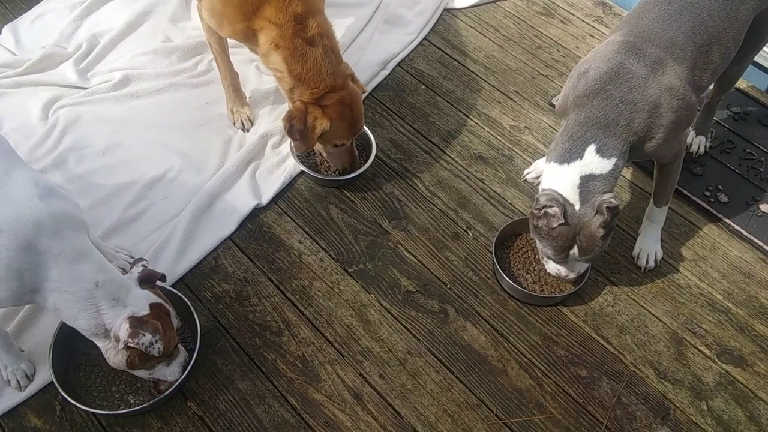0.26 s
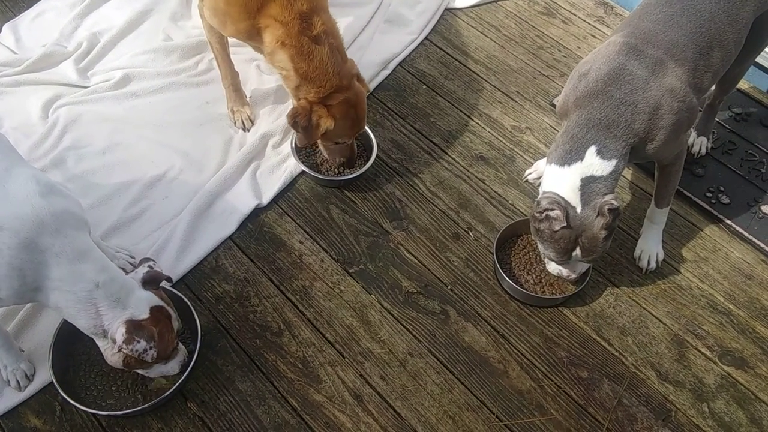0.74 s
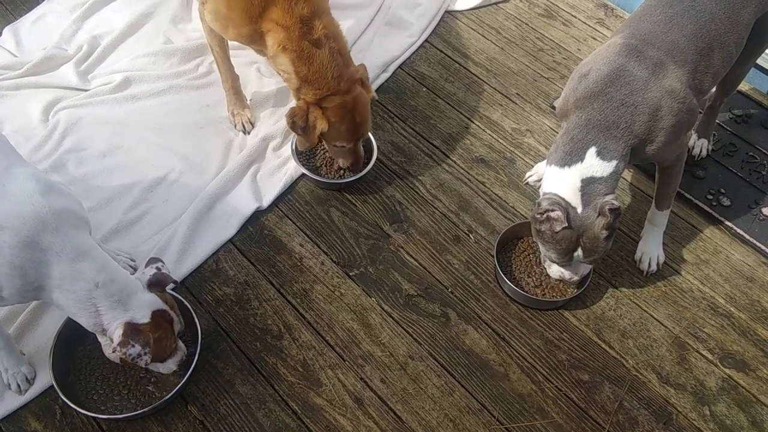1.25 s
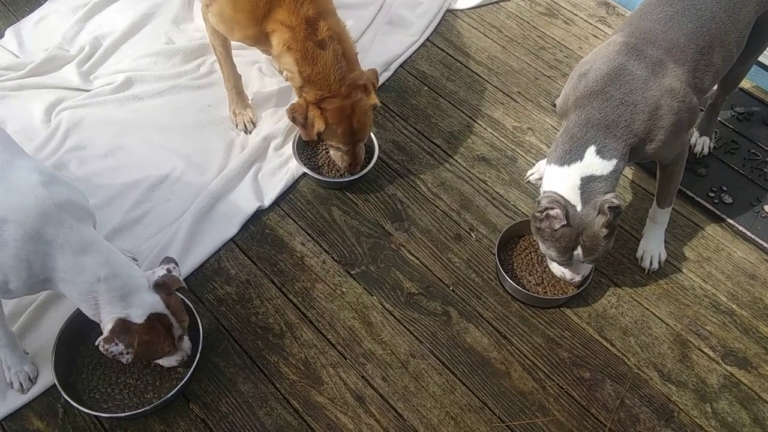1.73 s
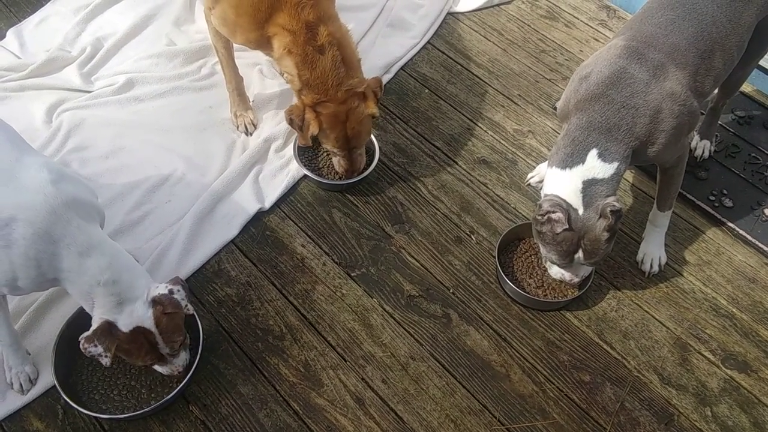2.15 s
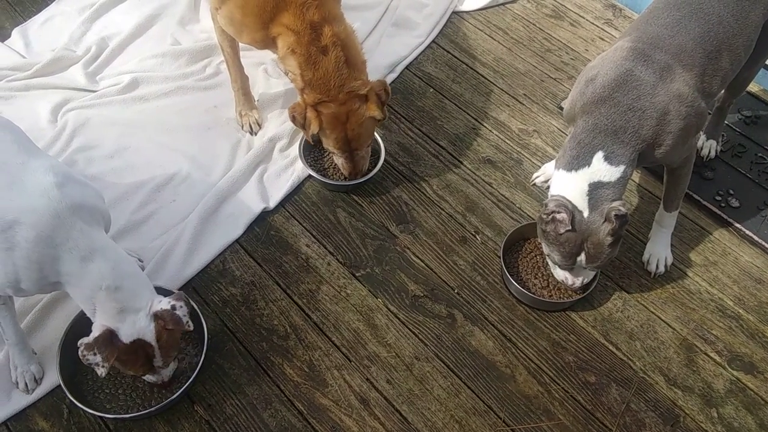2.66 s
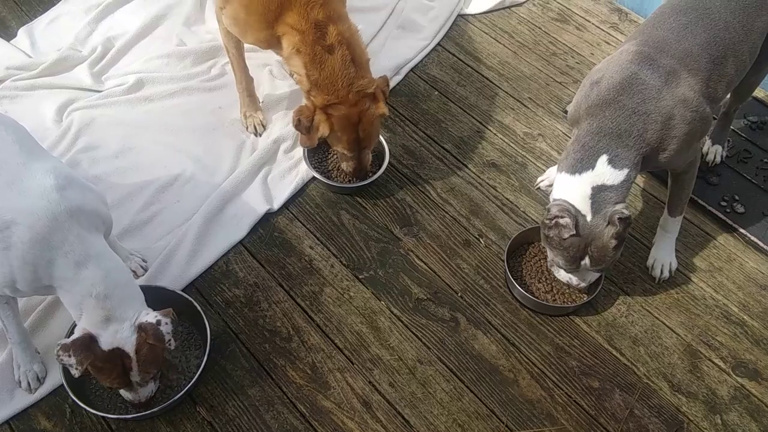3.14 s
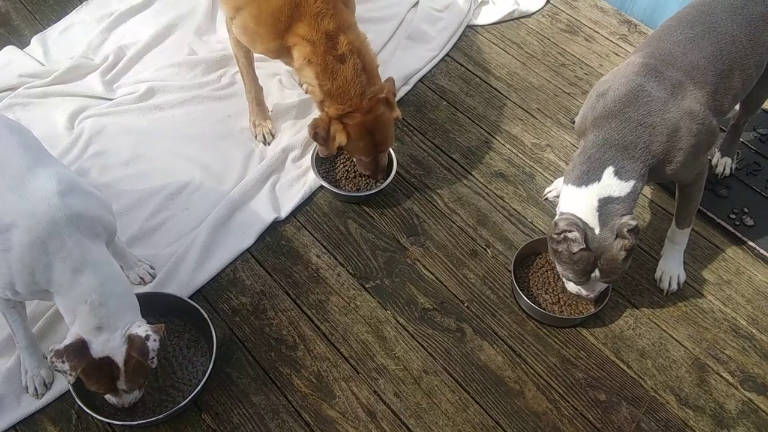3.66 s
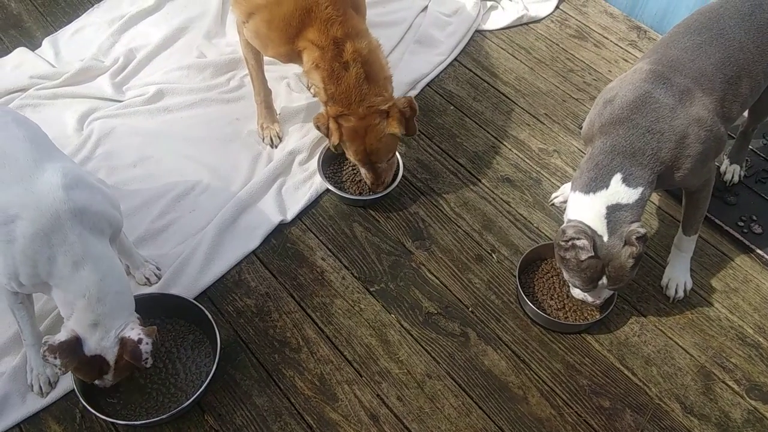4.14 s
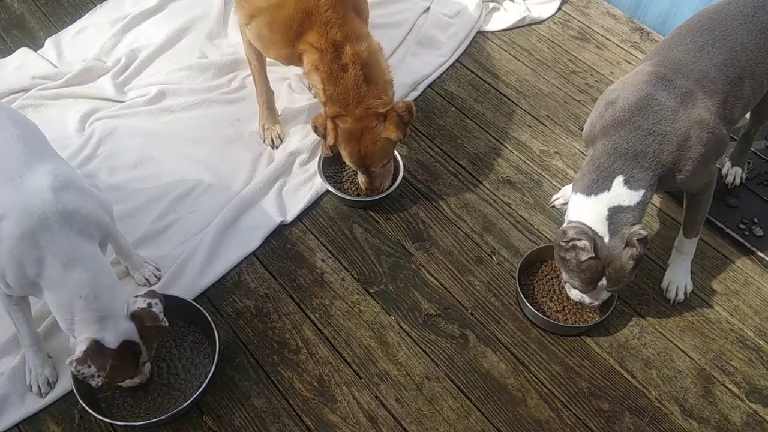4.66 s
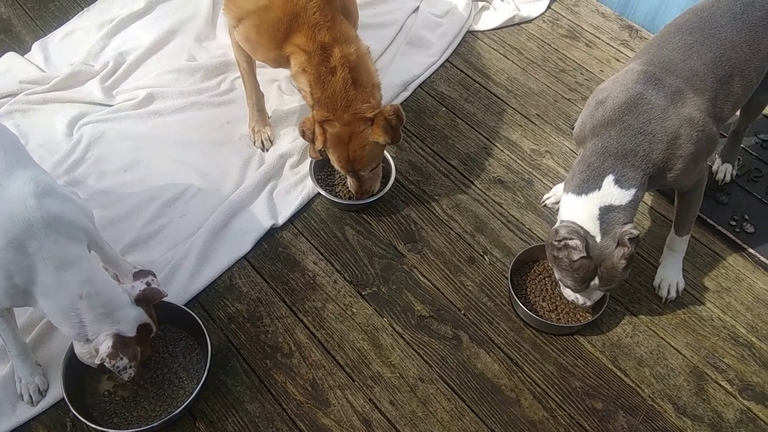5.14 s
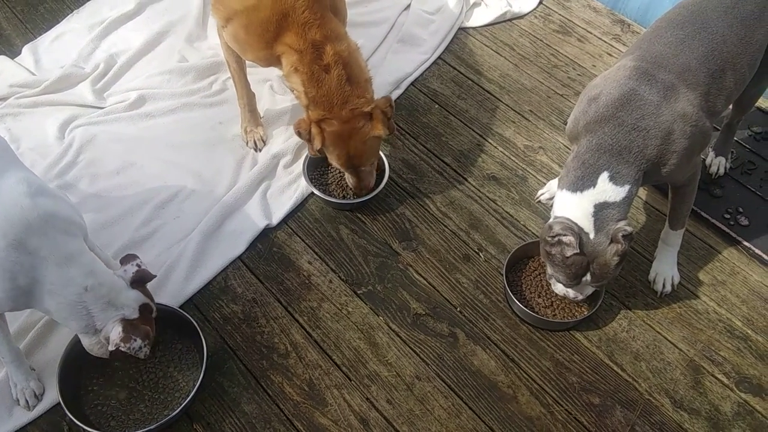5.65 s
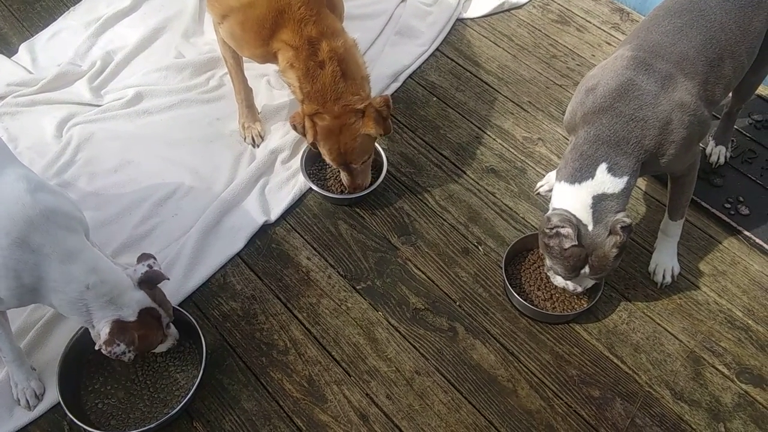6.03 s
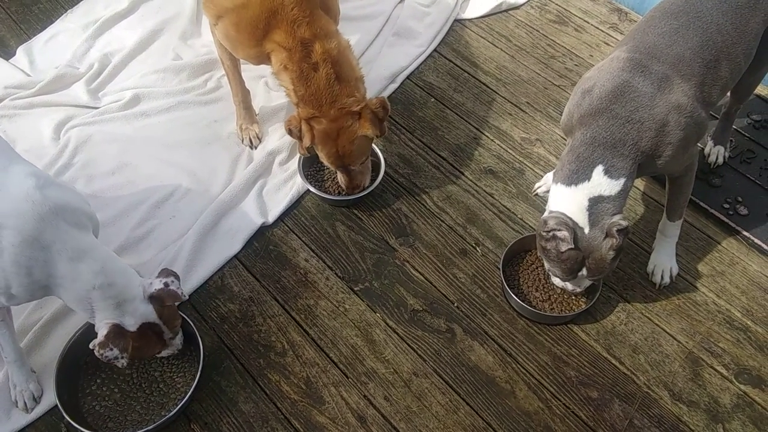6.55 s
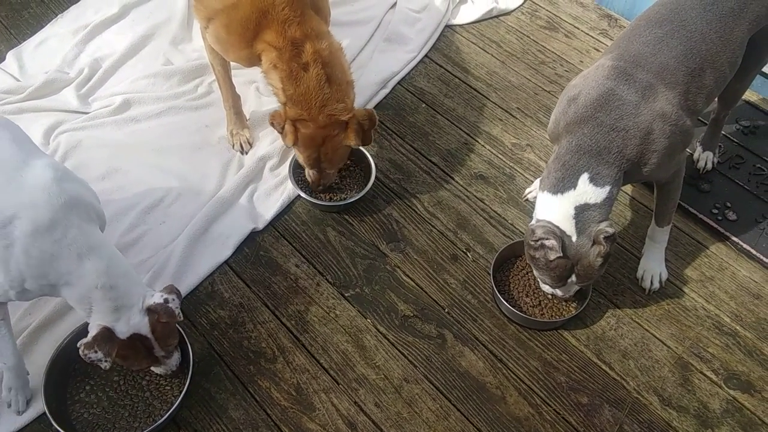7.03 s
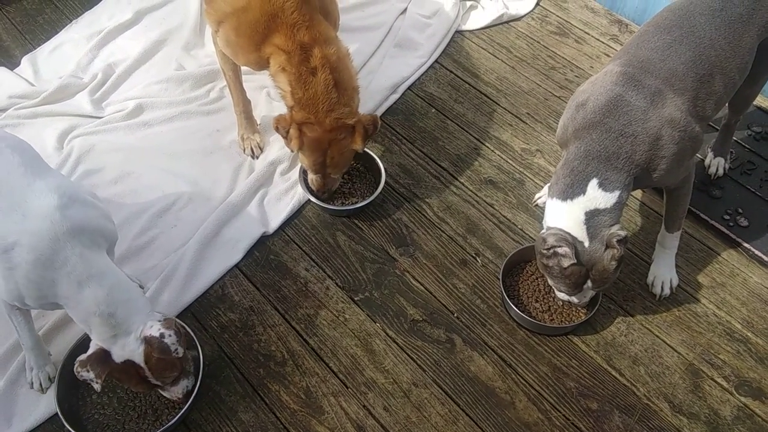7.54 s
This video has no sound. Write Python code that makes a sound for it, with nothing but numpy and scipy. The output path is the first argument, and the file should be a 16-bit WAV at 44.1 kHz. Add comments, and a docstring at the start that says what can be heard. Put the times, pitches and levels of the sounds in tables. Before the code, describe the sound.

Three dogs crunch dry kibble from metal bowls on an outdoor wooden deck, pellets popping, clicking and rattling in quick irregular bursts.

```python
"""An outdoor wooden deck in still air, where three dogs eat dry kibble from metal bowls.
Jaw strokes grind pellets in dense bursts of small fractures; single pellets pop in the hollow of a mouth,
click on teeth and bowls or snap brightly, and muzzles stir the food as a stream of small knocks.
The full bowls ring briefly, one is knocked on the boards, and the deck adds a short scatter."""
import sys
import numpy as np
from scipy import signal
from scipy.io import wavfile
from scipy.ndimage import uniform_filter1d

SR = 44100
rng = np.random.default_rng(int(sys.argv[2]) if len(sys.argv) > 2 else 0)


def master(y):
    """Save y as 16-bit WAV."""
    cut = np.clip(np.atleast_2d(y).T, -1, 1)
    pcm = np.round(cut * 32767)  # scale
    wavfile.write(sys.argv[1], SR, pcm.astype(np.int16))


N = 343539

# Colour of still outdoor air. Each row: frequency in Hz, relative level in dB per Hz.
AIR_COLOUR = [(30, -14), (110, -24.5), (1500, 9), (4000, -8), (6500, -46), (12200, -27.5)]
# Damped modes of the filled bowls. Each row: frequency in Hz, width in Hz, relative gain in dB.
BOWL_MODES = [(688, 52, 11), (812, 40, 1), (2326, 50, -2)]
# A hard shove knocks a bowl against the boards. One row: start in seconds, level of the thud in dB.
BOWL_KNOCK = (.6995, -48)
# What the knocked bowl rings with. Each row: frequency in Hz, peak in dB, 60 dB decay in seconds.
CLANK_MODES = [(1246, -22.5, 0.062), (1685, -7.5, 0.029), (2320, -8.5, 0.026), (3260, -16, 0.018)]
# Moments when all three muzzles leave the food alone. Each row: middle in seconds.
LULLS = [0.67, 0.99, 1.34, 1.68, 2.52, 2.7, 3.5, 3.88, 4.21, 4.62, 4.75, 6.08]
# Colour of the stirred pellets. Each row: frequency in Hz, relative level in dB per Hz.
STIR_COLOUR = [(200, -20), (400, -14), (800, -8), (1300, 7), (2100, 5), (3200, -5), (4600, -11),
               (7000, -34.5), (12000, -61)]
# The clearest brittle snaps at the front teeth. Each row: start in seconds, relative level in dB.
SNAPS = [(0.258, -58.5), (0.5146, -56.5), (0.7009, -43.5), (0.722, -48), (1.0919, -58), (1.1747, -55),
         (1.202, -50.5), (1.2318, -57.5), (1.5597, -56), (1.78, -44), (1.895, -56), (1.969, -59),
         (2.017, -49.5), (2.838, -48.5), (3.05, -57), (3.206, -58), (3.316, -57.5), (3.5898, -49.5),
         (3.606, -56), (4.0254, -51), (4.344, -48), (4.4846, -45), (4.5512, -55.5), (4.88, -56.5),
         (5.094, -56), (5.62, -53), (5.711, -55), (5.766, -51.5), (5.9533, -54), (6.104, -58), (6.151, -51),
         (6.488, -54.5), (6.6537, -49.5), (7.266, -60)]
# Colour of a brittle fracture. Each row: frequency in Hz, relative level in dB per Hz.
SNAP_COLOUR = [(3000, 24), (5500, 9.5), (7100, -8.5), (8600, 2.5), (11500, -5.5), (12700, -14.5),
               (15500, -33.5)]
# Hard pellets clicking on teeth and bowl walls.
# Each row: start in seconds, relative peak in dB, pitch in Hz.
TICKS = [(0.513, -35.5, 4120), (0.838, -32, 3100), (0.917, -37.5, 4520), (1.081, -28.5, 3250),
         (1.232, -29.5, 5280), (1.425, -22, 2770), (2.608, -37, 3120), (2.634, -35, 3500),
         (2.654, -31.5, 3560), (2.788, -33.5, 3750), (3.316, -29, 3160), (3.374, -33, 4000),
         (4.123, -39.5, 4940), (4.243, -35.5, 3580), (4.341, -18.5, 3070), (4.816, -30, 2920),
         (5.129, -19.5, 2970), (5.418, -25.5, 4120), (5.568, -25.5, 3250), (6.138, -29, 4080),
         (6.35, -29.5, 2800), (6.482, -33.5, 4390), (7.554, -31.5, 2890)]
# Jaws closing on a mouthful. Each row: start in seconds, relative peak in dB.
CHOMPS = [(0.001, -28.5), (1.054, -33.5), (2.025, -39), (2.74, -32.5), (3.878, -37.5), (4.485, -35),
          (5.091, -39.5), (6.144, -30.5), (6.435, -36), (6.748, -31.5)]
# The loudest pellets that crack or knock, each with the hollow that rings.
# Each row: start in seconds, relative level in dB, pitch of the hollow in Hz,
# relative level of the sharp edge in dB.
POPS = [(0.089, -24, 2230, -53), (0.104, -24, 1820, -38), (0.197, -21.5, 1400, -43),
        (0.267, -22, 2420, -50), (0.328, -17, 1610, -42), (0.534, -15.5, 1376, -54),
        (0.713, -15, 1560, -34), (0.721, -19, 1290, -34), (0.853, -15, 1905, -46), (0.943, -25, 2080, -42),
        (1.081, -27, 1070, -48), (1.171, -20.5, 1235, -36), (1.27, -27.5, 2630, -52),
        (1.398, -21.5, 1540, -62), (1.425, -21, 2180, -40), (1.469, -27.5, 2150, -41),
        (1.573, -21.5, 2280, -53), (1.782, -11.5, 1390, -28.5), (1.812, -24, 1540, -46),
        (1.871, -20.5, 1700, -48), (1.917, -19.5, 2040, -35), (2.016, -20, 1640, -38),
        (2.24, -26.5, 1390, -41), (2.312, -23, 1480, -45), (2.463, -19, 1320, -47),
        (2.581, -23, 1930, -45.5), (2.609, -35, 1280, -48), (2.656, -34, 1110, -50),
        (2.761, -18, 1980, -50), (2.799, -22, 720, -38.5), (2.837, -10.5, 1510, -40),
        (2.845, -14.5, 1520, -50), (2.86, -18.5, 1250, -52), (2.873, -18.5, 1280, -57),
        (2.884, -21, 1300, -42), (2.991, -27, 1310, -38.5), (3.057, -22, 1590, -40),
        (3.102, -26.5, 2000, -51), (3.141, -20, 1270, -61), (3.206, -29, 776, -40.5),
        (3.261, -23, 1195, -64), (3.447, -36.5, 644, -46), (3.597, -10, 1570, -35.5),
        (3.611, -17, 1430, -56), (3.732, -16, 1990, -35), (4.076, -19.5, 2100, -49),
        (4.141, -39, 2980, -33), (4.346, -10.5, 1835, -31), (4.353, -16, 1650, -38),
        (4.375, -22.5, 1200, -61), (4.404, -28, 1880, -55), (4.472, -20, 1670, -45),
        (4.699, -21.5, 1320, -47), (5.011, -27, 1940, -52), (5.094, -21, 1650, -36.5),
        (5.128, -20.5, 2170, -46), (5.346, -22, 1330, -56), (5.41, -21, 1580, -48),
        (5.467, -22.5, 1900, -57), (5.62, -23, 1790, -50), (5.643, -17, 1370, -56), (5.777, -20, 1940, -56),
        (5.868, -22, 2100, -27), (5.954, -17.5, 1375, -37.5), (5.965, -20.5, 1500, -54),
        (6.026, -26.5, 1190, -53), (6.154, -18.5, 1350, -38), (6.233, -26, 2000, -51),
        (6.254, -15.5, 1304, -49), (6.372, -27, 1320, -61), (6.391, -36, 750, -59),
        (6.442, -27.5, 2050, -49), (6.565, -24, 1090, -39), (6.622, -19.5, 1325, -64),
        (6.74, -24, 2000, -54), (6.754, -20, 1520, -38), (6.797, -23, 2080, -38), (6.878, -22, 2450, -38),
        (7.015, -22.5, 1400, -54), (7.12, -17, 1450, -64), (7.154, -21.5, 1340, -64),
        (7.42, -16.5, 1330, -57), (7.588, -24.5, 1350, -42), (7.634, -27.5, 1260, -55)]
# Where the sharp edge of a crack lies. One row: lower limit in Hz, upper limit in Hz.
EDGE_BAND_HZ = [2520, 3860]
# The firm jaw strokes of the three dogs. Each row: start in seconds, length in seconds,
# relative force on the pellets in dB, relative thud of the jaw in dB.
BITES = [(0.001, 0.01, -20.5, -44), (0.307, 0.041, -31.5, -37), (0.717, 0.032, -27, -31),
         (0.783, 0.024, -27.5, -46), (0.908, 0.027, -34, -62), (1.04, 0.038, -40.5, -46),
         (1.126, 0.069, -39, -42.5), (1.227, 0.036, -33, -62), (1.436, 0.017, -27.5, -40),
         (1.511, 0.02, -29, -39.5), (1.564, 0.027, -28, -44), (1.775, 0.066, -31, -41),
         (1.881, 0.11, -38, -48), (2.005, 0.027, -28.5, -36.5), (2.234, 0.019, -37, -45),
         (2.32, 0.039, -32, -38), (2.452, 0.028, -32.5, -42), (2.728, 0.029, -31, -40.5),
         (2.833, 0.039, -37, -40.5), (3.037, 0.022, -37, -36.5), (3.251, 0.049, -45, -39.5),
         (3.368, 0.067, -43, -47.5), (3.584, 0.036, -29.5, -41.5), (3.645, 0.037, -32, -42.5),
         (4.059, 0.043, -32.5, -42), (4.345, 0.015, -17.5, -41), (4.482, 0.022, -31, -38),
         (4.548, 0.039, -29, -44.5), (4.79, 0.036, -34.5, -38.5), (4.877, 0.021, -34.5, -50),
         (4.942, 0.014, -31.5, -47), (5.202, 0.035, -38.5, -58), (5.412, 0.018, -40, -37.5),
         (5.623, 0.016, -39, -43), (5.707, 0.017, -35.5, -32.5), (5.756, 0.022, -32.5, -47),
         (6.13, 0.065, -33, -43.5), (6.339, 0.021, -35.5, -46), (6.455, 0.037, -45, -45),
         (6.524, 0.059, -35.5, -42.5), (6.639, 0.03, -38, -47), (6.741, 0.027, -47, -37.5),
         (6.872, 0.023, -22, -64), (7.015, 0.024, -39, -34), (7.252, 0.034, -33.5, -45.5),
         (7.422, 0.018, -26.5, -37.5)]
# Colour of grinding between the teeth. Each row: frequency in Hz, relative level in dB per Hz.
CRUNCH_COLOUR = [(200, -37), (420, -4.5), (700, -7), (1400, 10), (2200, -0.5), (3200, -14.5), (4600, -21.5),
                 (6500, -33.5)]

AIR_DB = -55.5
LULL_DB, LULL_S = -7.5, 0.035  # how far the stirring sinks, and how wide the dip is either side
# fainter snaps come at random: rate, middle level before the boost, spread either way
CRUMBS_PER_S, CRUMB_DB, CRUMB_SPREAD_DB = 6, -61, 8.5
RING_WIDTH_HZ = 184  # width of the hollow's resonance
POP_CREST_DB = 7     # allowance for the peak of a pop over its rms
LOW_EDGE_HZ, HIGH_EDGE_HZ = 900, 2800  # where jaw, pellets and crackle divide
# the crackle of a bite grows more slowly than its force: level at an ordinary force, and dB per dB
ORDINARY_FORCE_DB, CRACKLE_DB, CRACKLE_FOLLOWS = -35, -45.5, 0.39
CUTOFF_HZ = 15760


def from_db(db):
    """Amplitude factor of a level in dB."""
    return 10 ** (np.asarray(db) / 20)


def rms(x):
    """Root mean square, kept above zero."""
    return np.sqrt(np.mean(x ** 2) + 1e-20)


def seconds(length):
    """Time axis of a short sound."""
    return np.arange(int(length * SR)) / SR


def add(track, s, sound):
    """Lay a sound into the track at time s."""
    at = int(np.clip(s * SR, 0, N - 1))
    track[at:at + len(sound)] += sound[:N - at]


def band(x, hz, kind, order=2):
    """Butterworth filter."""
    sos = signal.butter(order, np.clip(hz, 20, .45 * SR), kind, fs=SR, output="sos")
    return signal.sosfilt(sos, x + 1e-18)


def resonate(x, hz, width_hz):
    """One damped resonance with a gain of about 1 on top."""
    r = np.exp(-np.pi * width_hz / SR)
    zeros = np.array([1, 0, -1]) * (1 - r * r) / 2
    poles = [1, -2 * r * np.cos(2 * np.pi * hz / SR), r * r]
    return signal.lfilter(zeros, poles, x + 1e-18)


def at_hz(points, hz):
    """Level of a colour at one frequency."""
    freqs, levels = np.transpose(points)
    return np.interp(np.log(hz), np.log(freqs), levels)


def coloured(excite, colour, count=18):
    """A bank of adjoining bands; excite(centre Hz) gives the drive of each."""
    edges = np.geomspace(colour[0][0], colour[-1][0], count + 1)
    centres = np.sqrt(edges[1:] * edges[:-1])
    total = 0
    for hz, low, high in zip(centres, edges, edges[1:]):
        total = total + from_db(at_hz(colour, hz)) * band(excite(hz), [low, high], "band")
    return total


def grains(size, per_s, spread_db):
    """Clicks at random moments: many small, few large."""
    clicks = np.zeros(size)
    when, strength, sign = rng.random((int(per_s * size / SR) + 1, 3)).T
    level_db = -spread_db * np.log(np.maximum(strength, .02))
    clicks[(when * size).astype(int)] = from_db(level_db) * np.sign(sign - .5)
    return clicks


def scatter(t, t60):
    """Dense reflections that die away, with unit energy."""
    tail = rng.standard_normal(len(t)) * from_db(-60 * t / t60)
    return tail / np.sqrt(np.sum(tail ** 2))


def rattle(colour, per_s, spread_db, shared, ring_width_hz, count):
    """Pellet contacts: many ring at a few pitches in each band, sharp ones strike every band at once."""
    sharp = grains(N, per_s, spread_db)
    at = np.flatnonzero(sharp)

    def strike(hz):
        crumbs = max(hz / 2000, 1)  # high crumbs are the most numerous
        drive = np.zeros(N)
        drive[at] = shared * sharp[at] * rng.standard_normal(len(at))
        balance = np.sqrt((1 + .1 * hz / ring_width_hz) / crumbs)
        for pitch in hz * rng.uniform(.92, 1.08, 4):
            contacts = grains(N, per_s * crumbs / 4, spread_db)
            drive += balance * resonate(contacts, pitch, ring_width_hz)
        return drive

    sound = coloured(strike, colour, count=count)
    return sound / rms(sound)


def evened(x, window_s):
    """Steady the slow level of a stream while keeping its grain."""
    power = np.abs(uniform_filter1d(x * x, max(int(window_s * SR), 8)))
    return x / np.sqrt(power + 1e-9)


def around(times, db, reach_s):
    """Swells that rise quickly to each moment and fall more slowly; overlaps add in power."""
    t = np.arange(0, N, 100) / SR
    after = t[:, None] - times
    swells = np.exp(-np.maximum(after, -2 * after) / reach_s)
    power = np.sum(from_db(db) ** 2 * swells, axis=1)
    return np.interp(np.arange(N) / SR, t, np.sqrt(power))


def still_air():
    """Outdoor air as a steady bed of noise, shaped band by band."""
    air = coloured(lambda hz: rng.standard_normal(N), AIR_COLOUR, count=18)
    return from_db(AIR_DB) * air / rms(air)


def deck(x, wet_db=-11.0, t60=0.077):
    """Faint scatter from the boards, the dogs and a nearby wall."""
    t = seconds(.3)
    reflections = scatter(t, t60) * (t > .005)
    return x + from_db(wet_db) * signal.fftconvolve(x, reflections)[:N]


def bowls(x, swing_db=5.0, contact_db=-3.5):
    """Eating sets the bowls' metal ringing, more or less as muzzles and food press on it."""
    press = band(rng.standard_normal(N), 16, "low")
    drive = x * from_db(contact_db + swing_db * np.clip(press / rms(press), -2, 2))
    return x + sum(from_db(db) * resonate(drive, hz, width_hz) for hz, width_hz, db in BOWL_MODES)


def knock(chatter_s=0.0036):
    """The shoved bowl chatters for an instant and clanks; the boards give a short, dull thud under it."""
    out, t = np.zeros(N), seconds(.1)
    s, db = BOWL_KNOCK
    push = t / .0015  # the thud peaks after 1.5 ms
    add(out, s, from_db(db) * push * np.exp(1 - push))
    for hz, mode_db, t60 in CLANK_MODES:
        chatter = rng.standard_normal(len(t)) * (t < chatter_s) * np.exp(-t / chatter_s)
        width_hz = np.log(1000) / (np.pi * t60)
        ring = band(resonate(chatter, hz, width_hz), [hz / 2, hz * 1.27], "band")
        add(out, s, from_db(mode_db) * ring / np.abs(ring).max())
    return out


def stirring(chew_db=-22.0, chew_s=0.095, pellet_db=-47.0, pellet_s=0.015, rest_db=-45.5,
             split_hz=600, window_s=0.047):
    """Loose pellets jostle and knock around bites and cracks; soft low chewing swells with the jaw."""
    start, length, _, thud_db = np.transpose(BITES)
    middle = start + length / 2
    contacts = np.concatenate([middle, [row[0] for row in list(POPS) + list(TICKS)]])
    stream = rattle(STIR_COLOUR, per_s=75, spread_db=5, shared=.45, ring_width_hz=230, count=30)
    low = evened(band(stream, split_hz, "low", order=4), window_s)
    high = evened(band(stream, split_hz, "high", order=4), window_s)
    chewing = around(middle, thud_db + chew_db, chew_s) * low
    # the jostling never falls below a resting level, except in the lulls
    pellets = np.hypot(around(contacts, pellet_db, pellet_s), from_db(rest_db)) * high
    t = np.arange(N) / SR
    lull = sum(np.exp(-((t - s) / LULL_S) ** 2) for s in LULLS)
    return from_db(LULL_DB * lull) * (chewing + pellets)


def snaps(gain_db=18.0, rise_s=0.0016, burst_s=0.019, tail_db=-17.0, tail_s=0.036, uneven_db=-6.0):
    """Dry fractures outside the lips: quick runs of weakening cracks and stray crumbs, each a spray."""
    t = seconds(.08)
    step_s, loss_db = .006, 5.5  # mean gap between the cracks of a run, and what each one loses
    crumbs = []
    for when, size in rng.random((int(CRUMBS_PER_S * N / SR), 2)):
        crumbs.append((when * N / SR, CRUMB_DB + CRUMB_SPREAD_DB * (2 * size - 1)))
    runs = []
    for s, db in SNAPS:
        for k in range(3):
            runs.append((s + k * step_s * (.5 + rng.random()), db - k * loss_db))

    def strike(hz):
        cracks = np.zeros(N)
        for s, db in runs + crumbs:
            spray = scatter(t, burst_s) + from_db(tail_db) * scatter(t, tail_s)
            spray = spray * (1 - np.exp(-t / rise_s))
            # a random boost in each band gives every crack a colour of its own
            boost_db = gain_db + uneven_db * (2 * rng.random() - 3.0)
            add(cracks, s, from_db(db + boost_db) * spray)
        return cracks

    return coloured(strike, SNAP_COLOUR, count=12)


def ticks(gain_db=0.5, contact_s=0.034, width_hz=260, spray_db=-17.0):
    """A hard pellet clicks on a tooth or the bowl wall and rings briefly at a high pitch of its own."""
    out, t = np.zeros(N), seconds(.06)
    for s, db, hz in TICKS:
        contact = scatter(t, contact_s)
        tick = resonate(contact, hz, width_hz) + from_db(spray_db) * contact
        tick = band(tick, [hz / 1.35, hz * 1.19], "band")
        add(out, s, from_db(db + gain_db) * tick / np.abs(tick).max())
    return out


def chomps(hz=460, gain_db=-1.5):
    """The jaws meet softly and the closed mouth gives a broad, hollow thump, always at one pitch."""
    out, t = np.zeros(N), seconds(.08)
    width_hz, contact_s = 230, .07
    for s, db in CHOMPS:
        note = resonate(resonate(scatter(t, contact_s), hz, width_hz), hz, 2 * width_hz)
        add(out, s, from_db(db + gain_db) * note / np.abs(note).max())
    return out


def pops(burst_s=.016, spray_db=-10.0, tail_db=-9.0, tail_s=0.045, edge_s=0.032):
    """A pellet gives way with a sharp edge, crumbles over milliseconds and rings the hollow around it."""
    out, t = np.zeros(N), seconds(.08)
    early = t < .006

    def hollow(drive, hz):
        return resonate(resonate(drive, hz, RING_WIDTH_HZ), hz, 4 * RING_WIDTH_HZ)

    for s, db, hz, sharp_db in POPS:
        crack = scatter(t, burst_s) * np.sqrt(t)  # the fracture swells, then dies away
        bounces = scatter(t, tail_s) * ~early     # and scatters round the bowl
        ring, tail = hollow(crack, hz), hollow(bounces, hz)
        sound = ring / rms(ring) + from_db(tail_db) * tail / rms(tail)
        sound += from_db(spray_db) * crack / rms(crack)
        sound = band(sound, [hz / 2.0, hz * 1.9], "band", order=3)  # cheeks and lips muffle the rest
        edge = band(scatter(t, edge_s), EDGE_BAND_HZ, "band", order=3)
        pop = from_db(db - POP_CREST_DB) * sound / rms(sound) + from_db(sharp_db) * edge / rms(edge)
        # scale by the share of the window that the early part fills
        add(out, s, pop * np.sqrt(early.mean()))
    return out


def crunches(rise_s=0.0022, fall_s=0.0035, low_db=-7.5, mid_db=-5.5, splinter_db=-62.5,
             splinter_growth=2.9, window_s=0.025):
    """Each jaw stroke crushes pellets in a dense run of fractures; hard bites throw bright splinters."""
    t = np.arange(N) / SR
    power = np.zeros((3, N))
    for start, length, force_db, thud_db in BITES:
        crackle_db = CRACKLE_DB + CRACKLE_FOLLOWS * (force_db - ORDINARY_FORCE_DB)
        levels = from_db([thud_db, force_db, crackle_db])
        near = slice(max(int((start - .03) * SR), 0), int((start + length + .08) * SR))
        rise = np.minimum(t[near] - start, 0) / rise_s
        fall = np.maximum(t[near] - start - length, 0) / fall_s
        power[:, near] += (levels[:, None] * np.exp(rise - fall)) ** 2
    low, mid, high = np.sqrt(power)

    grind = rattle(CRUNCH_COLOUR, per_s=240, spread_db=5.5, shared=0.66, ring_width_hz=370, count=22)
    low_grind = evened(band(grind, LOW_EDGE_HZ, "low", order=4), window_s)
    mid_grind = evened(band(grind, [LOW_EDGE_HZ, HIGH_EDGE_HZ], "band", order=4), window_s)
    high_grind = evened(band(grind, HIGH_EDGE_HZ, "high", order=4), window_s)
    jaw = from_db(low_db) * low * low_grind
    pellets = from_db(mid_db) * mid * mid_grind
    crackle = high * high_grind

    splinters = rattle(SNAP_COLOUR, per_s=250, spread_db=3.5, shared=0.5, ring_width_hz=390, count=14)
    splinters = evened(splinters, window_s)
    # the harder the bite, the larger the share of splinters
    hardness = high / from_db(-46)
    return jaw + pellets + crackle + from_db(splinter_db) * hardness ** splinter_growth * splinters


def scene():
    """Eating and the knock ring through bowls and deck, over still air."""
    mouths = stirring() + snaps() + ticks() + chomps() + pops() + crunches()
    eating = band(mouths, 170, "high", order=3) + knock()
    return (from_db(-1.0) * deck(bowls(eating)) + still_air())[None]


def record(dry):
    """A small microphone: rounded peaks, thin bass, the top cut."""
    rounded = .9 * np.tanh(dry / .9)
    thinned = band(rounded, 30, "high", order=1)
    top_cut = signal.ellip(10, .1, 80, CUTOFF_HZ, fs=SR, output="sos")
    return signal.sosfilt(top_cut, thinned)


dry = scene()
out = record(dry)
master(out)
```